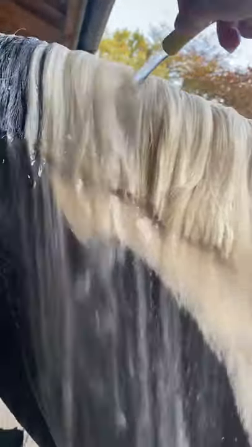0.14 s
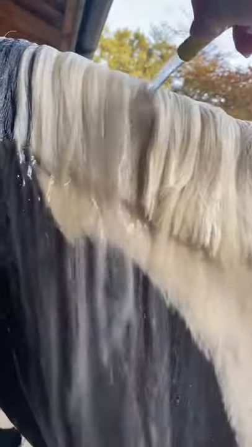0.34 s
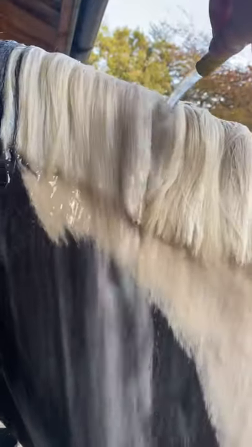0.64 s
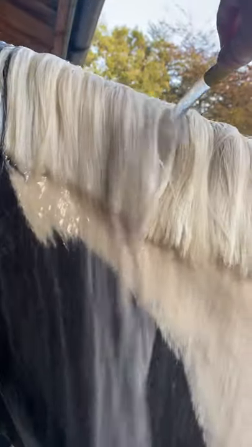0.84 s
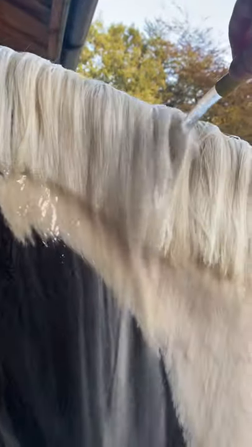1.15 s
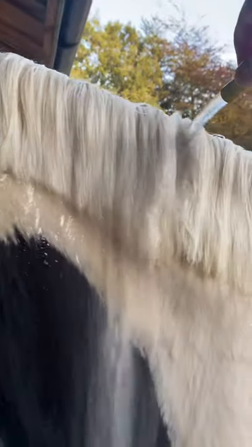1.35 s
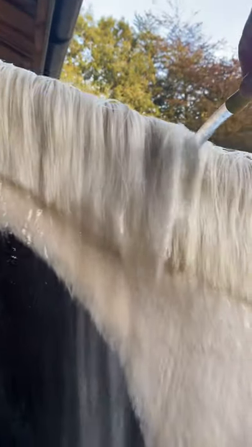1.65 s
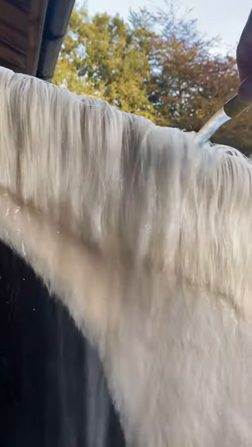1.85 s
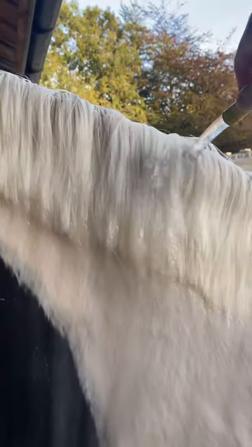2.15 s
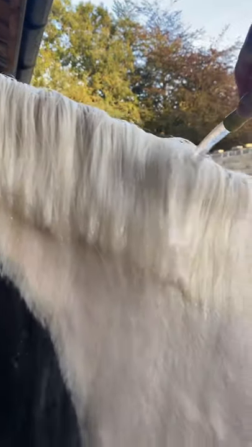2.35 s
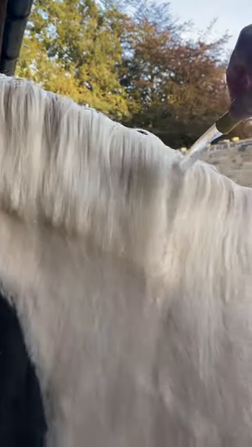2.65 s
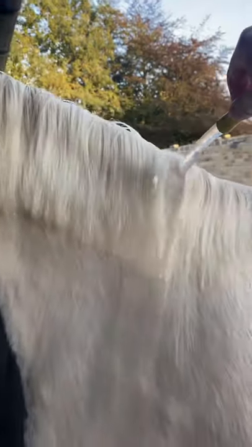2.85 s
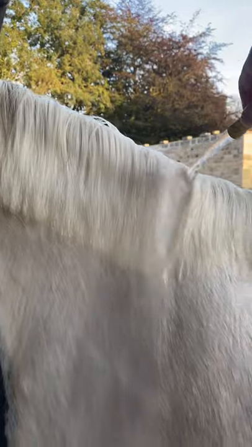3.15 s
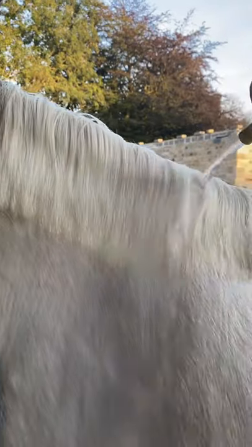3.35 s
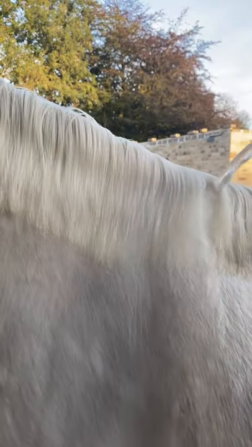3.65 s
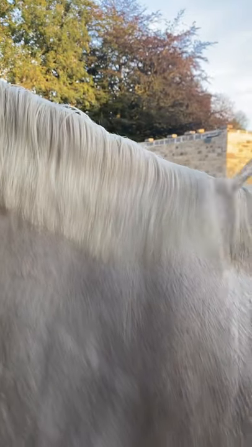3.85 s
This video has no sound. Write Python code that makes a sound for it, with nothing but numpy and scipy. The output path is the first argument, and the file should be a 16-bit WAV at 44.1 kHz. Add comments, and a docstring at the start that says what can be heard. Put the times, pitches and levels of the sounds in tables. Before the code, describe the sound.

Close, crisp hose water gurgles and spatters over wet horse hair, with irregular bright drips throughout. A deep wavering engine hum and soft road rumble swell early, then recede, leaving thinner water in a quiet outdoor yard.

```python
"""Outdoors near a road: water from a hose runs over a horse's wet mane, and a vehicle passes behind.
Road: filtered noise for rumble, tyre roar and murmur. Engine: a wavering sine drone and its octave.
Water: flickering noise and random short pings for gurgle and spray; timed pings for plops and ticks.
Two close microphone ports hear the water with a phase offset that changes with pitch."""
import sys
import numpy as np
from scipy import signal
from scipy.fft import rfft, irfft
from scipy.io import wavfile
from scipy.ndimage import uniform_filter1d

SR = 44100
rng = np.random.default_rng(int(sys.argv[2]) if len(sys.argv) > 2 else 0)


def unload_wav(signal):
    """Save mono or channel-first audio to the path in sys.argv[1] as 16-bit WAV at rate SR, clipped to [-1, 1]."""
    wavfile.write(
        sys.argv[1],
        SR,
        np.round(np.clip(np.atleast_2d(signal).T, -1, 1) * 32767).astype(np.int16),
    )


N = 176400


def amp(db):
    """Amplitude factor from decibels."""
    return 10 ** (np.asarray(db) / 20)


def evened(x):
    """Scale to unit RMS."""
    return x / np.sqrt(np.mean(x ** 2) + 1e-20)


def read(points, hz):
    """Interpolate a (Hz, value) table over log frequency."""
    point_hz, value = np.transpose(points)
    return np.interp(np.log(hz + 1), np.log(point_hz + 1), value)


def curve(table, column):
    """Interpolate one column of a table over time."""
    return np.interp(np.arange(N) / SR, [row[0] for row in table], [row[column] for row in table])


def coloured(x, spectrum):
    """Filter by a (Hz, dB) spectrum, then scale to unit RMS."""
    gain = amp(read(spectrum, np.fft.rfftfreq(N, 1 / SR)))
    return evened(irfft(rfft(x) * gain, N))


def drift(seconds):
    """Slow random curve of unit RMS: noise averaged twice over the given span."""
    span = max(int(seconds * SR), 1)
    once = uniform_filter1d(rng.standard_normal(N), span)
    return evened(uniform_filter1d(once, span))


def blend(same, a, b):
    """Mix spectra a and b, with likeness 0..1 to a, at constant power."""
    return same * a + np.sqrt(1 - same ** 2) * b


# road levels before the left-right lean: start_s, rumble_db, tyre_db, hollow_db
ROAD_LEVELS = [(0.0, -40, -45.5, -56), (0.04, -54, -50, -59), (0.61, -49.5, -51, -58.5),
               (1.05, -45, -48, -55), (1.35, -44.5, -49.5, -46), (1.56, -44, -49.5, -49.5),
               (2.72, -55, -55, -71), (3.97, -57, -57, -63), (4.0, -80, -54, -72)]
# rumble spectrum: freq_hz, gain_db
RUMBLE_SPECTRUM = [(25, -34), (45, -8), (80, 1), (150, -6), (210, -7), (300, -22.5), (500, -59)]
# tyre roar spectrum: freq_hz, gain_db
TYRE_SPECTRUM = [(400, -14), (700, -12), (950, -3.5), (1150, -8), (1400, -10.5), (1800, -16), (2600, -45)]
# hollow part of the roar: freq_hz, gain_db
HOLLOW_SPECTRUM = [(500, -13), (700, -1.5), (800, 4.5), (880, 0), (1100, -57)]
# outdoor murmur spectrum: freq_hz, gain_db
MURMUR_SPECTRUM = [(60, 0), (150, -6), (300, 2), (450, -1), (650, -10), (1200, -57)]
# left-right likeness of the road: freq_hz, likeness_ratio
ROAD_LIKENESS = [(100, 1), (290, 0.95), (600, 0.47), (1500, 0.25)]
# left minus right level of the road: freq_hz, lean_db
ROAD_LEAN_DB = [(60, -4.5), (110, 1.5), (200, 2), (380, 1.5), (700, 4), (1290, 3.5), (2380, 0.5)]
MURMUR_DB = -57


def road():
    """Broadband noise layers: rumble, tyre roar, hollow band, steady murmur; leans left above about 100 Hz."""
    hz = np.fft.rfftfreq(N, 1 / SR)
    layers = [(curve(ROAD_LEVELS, column=1), RUMBLE_SPECTRUM),
              (curve(ROAD_LEVELS, column=2), TYRE_SPECTRUM),
              (curve(ROAD_LEVELS, column=3), HOLLOW_SPECTRUM),
              (MURMUR_DB, MURMUR_SPECTRUM)]

    def take():
        return rfft(sum(amp(db) * coloured(rng.standard_normal(N), spectrum) for db, spectrum in layers))

    a, b = take(), take()
    same = np.clip(read(ROAD_LIKENESS, hz), 0, 1)
    lean = amp(read(ROAD_LEAN_DB, hz) / 2)
    return irfft([a * lean, blend(same, a, b) / lean], N)


# engine RMS levels before waver: start_s, drone_db, octave_db
ENGINE_LEVELS = [(0.0, -35, -49), (0.1, -31, -46.5), (0.48, -37.5, -57.5), (0.63, -34, -45),
                 (0.8, -37, -45), (0.85, -36, -50), (1.06, -31, -40.5), (1.22, -29, -51),
                 (1.34, -31, -36.5), (1.48, -50.5, -58.5), (1.6, -42.5, -35), (2.0, -34.5, -57.5),
                 (2.12, -50, -46.5), (2.25, -43.5, -59), (2.99, -42, -53.5), (3.11, -46.5, -69),
                 (3.39, -50, -59), (3.87, -56, -66), (4.0, -55, -58)]
# engine firing rate, the drone pitch before waver: start_s, pitch_hz
FIRING_RATE = [(0, 61), (.9, 60.3), (1.35, 59.5), (1.6, 58.5), (2, 59.8), (4, 60)]
DRONE_WAVER_DB, OCTAVE_WAVER_DB, PITCH_WAVER_TURNS = 1, 4.1, 0.015


def engine():
    """Sine at the firing rate and its octave, sharing one wavering phase, each wavering in level."""
    turns = np.cumsum(curve(FIRING_RATE, column=1)) / SR + PITCH_WAVER_TURNS * drift(0.044)
    drone_db = curve(ENGINE_LEVELS, column=1) + DRONE_WAVER_DB * drift(0.0185)
    octave_db = curve(ENGINE_LEVELS, column=2) + OCTAVE_WAVER_DB * drift(0.0084)
    drone = amp(drone_db) * np.sin(2 * np.pi * turns)
    octave = amp(octave_db) * np.sin(4 * np.pi * turns)
    return np.sqrt(2) * (drone + octave)  # unit-RMS sines


def hits(rate_per_s, spread_db):
    """Random impulses; exponential dB excess makes a few large."""
    size = amp(spread_db * np.minimum(rng.exponential(1, N), 4))
    return (rng.random(N) < rate_per_s / SR) * size


BURST_DECAY_S, BURSTS_PER_S, BURST_SPREAD_DB = 0.0014, 300, 4  # rate: median, clumping varies it


def bursts():
    """Small drops breaking up: spray loudness jumps and dies within milliseconds."""
    train = hits(BURSTS_PER_S * amp(4 * drift(0.012)), BURST_SPREAD_DB)
    decay = np.exp(-np.arange(900) / SR / BURST_DECAY_S)
    return evened(signal.oaconvolve(train, decay)[:N])


def droplets(lo_hz, hi_hz, cycles, per_s, spread_db, clump_db, count=24):
    """Clumped short pings of many pitches, a few large; the second path is a quarter turn off, random sign."""
    clumps = amp(clump_db * drift(0.01))
    out, t = np.zeros((2, N)), np.arange(600) / SR
    for hz in np.geomspace(lo_hz, hi_hz, count):
        angle = 2 * np.pi * hz * t
        shape = t * hz * np.exp(-2 * t * hz / cycles)
        train = hits(per_s * clumps / count, spread_db)
        flipped = train * rng.choice([-1, 1], N)
        out[0] += signal.oaconvolve(train, evened(shape * np.sin(angle)))[:N]
        out[1] += signal.oaconvolve(flipped, evened(shape * np.cos(angle)))[:N]
    return evened(out)


# water flow: start_s, gurgle_db, spray_db
FLOW_LEVELS = [(0.0, -52, -50.5), (0.154, -45.5, -53.5), (0.312, -44.5, -42.5), (0.512, -46, -47),
               (0.702, -47.5, -45), (0.83, -50.5, -48), (0.86, -53, -62), (0.89, -51, -49),
               (0.98, -54, -54.5), (1.01, -41, -55), (1.23, -42, -46.5), (1.61, -45.5, -44),
               (2.26, -44.5, -45.5), (2.4, -43, -43.5), (2.5, -46, -42.5), (2.72, -48.5, -45.5),
               (2.88, -52, -49.5), (3.15, -50.5, -50.5), (3.44, -53, -51), (4.0, -55.5, -51)]
# gurgle spectrum: freq_hz, gain_db
GURGLE_SPECTRUM = [(1200, -6.5), (1850, -7), (2050, 0.5), (2230, -2.5), (2450, 3.5), (2750, -1), (3150, 3),
                   (3480, -2), (3800, 1), (5200, -2.5), (6500, -2.5)]
# spray spectrum: freq_hz, gain_db
SPRAY_SPECTRUM = [(2500, -14), (4000, -4), (5200, 0), (6200, -2.5), (8500, -2.5), (11000, -4.5),
                  (13000, -7), (16000, -9.5)]
MIST_DB, PATTER_DB, BURST_SHARE = -6, -3.5, 0.55  # fine, coarse droplets and bursts re unit hiss


def stream():
    """Gurgle in the hair and fine spray: flickering hiss plus droplets, two paths surging together."""
    flicker, pops = drift(0.02), BURST_SHARE * bursts()
    gurgle = rng.standard_normal((2, N)) * (amp(4.5 * flicker + 1.3 * drift(0.05)) + pops)
    spray = rng.standard_normal((2, N)) * (amp(1.5 * flicker) + pops)
    gurgle += amp(PATTER_DB) * droplets(1900, 5400, cycles=3, per_s=900, spread_db=2, clump_db=5)
    spray += amp(MIST_DB) * droplets(4150, 13900, cycles=2.3, per_s=700, spread_db=2.9, clump_db=5.3)
    gurgle_amp, spray_amp = amp(curve(FLOW_LEVELS, column=1)), amp(curve(FLOW_LEVELS, column=2))
    return np.array([gurgle_amp * coloured(g, GURGLE_SPECTRUM) + spray_amp * coloured(s, SPRAY_SPECTRUM)
                     for g, s in zip(gurgle, spray)])


SPATTER_DECAY_S = 0.009
CRACK_DB = -8.5  # noise gain re ping peak
LEAD_FROM_HZ = 5800  # second path lags for lower drops, leads for higher


def drops(table, cycles, width):
    """Each drop: a thin noise crack, a Gaussian ping, a dying noise spatter; two paths."""
    size = 2400
    t, freq_hz = np.arange(size) / SR, np.fft.rfftfreq(size, 1 / SR)
    out = np.zeros((2, N + size))
    for start_s, peak_db, pitch_hz, spatter_db in table:
        noise = rng.standard_normal((5, size))
        hiss, snap, lumps = noise[:2], noise[2:4], noise[4]

        turn = np.array([[0], [np.sign(pitch_hz - LEAD_FROM_HZ) * np.pi / 2]])
        envelope = np.exp(-(t * pitch_hz / cycles - 2) ** 2)
        ping = envelope * np.sin(2 * np.pi * pitch_hz * t + turn)

        crack_envelope = np.exp(-abs(t - cycles / pitch_hz) / 0.00017)
        crack = amp(CRACK_DB) * np.diff(snap, prepend=0) * crack_envelope

        lumpy = hiss * amp(4 * evened(uniform_filter1d(lumps, size=30)))
        resonance = 1 / (1 + (np.log(freq_hz / pitch_hz + 1e-3) / width) ** 2)
        low_cut = freq_hz ** 2 / (freq_hz ** 2 + (0.54 * pitch_hz) ** 2)
        fizz = evened(irfft(rfft(lumpy) * resonance * low_cut))
        fade = np.minimum(t / 0.00022, 1) * np.exp(-t / SPATTER_DECAY_S)
        spatter = amp(spatter_db) * fizz * fade

        first = round(start_s * SR)
        out[:, first:first + size] += amp(peak_db) * (ping + crack + spatter)
    return out[:, :N]


# single plops: start_s, ping_peak_db, pitch_hz, spatter_db (re ping peak, before its fade)
PLOP_DROPS = [(0.121, -33.5, 2780, -5.5), (0.274, -34.5, 2650, -8), (0.3145, -34, 3800, -0.5),
              (0.4544, -31, 3580, -4), (0.4675, -33, 4470, -5), (0.4815, -29, 4300, -8),
              (0.5677, -26.5, 4100, -9), (0.587, -31, 3840, -2), (0.6062, -38, 3540, -19.5),
              (0.666, -34.5, 3540, -4), (0.846, -36, 2830, -8), (1.005, -39, 2960, 0),
              (1.0858, -26.5, 3280, -1.5), (1.32, -37, 3080, -11), (1.349, -30.5, 2840, -6),
              (1.377, -36, 2470, -1), (1.6006, -32.5, 3030, -6), (1.6392, -34, 2450, -5.5),
              (1.6936, -29.5, 2500, -11), (1.8436, -35.5, 3160, -3.5), (1.9333, -53, 2440, -12),
              (1.9475, -23.5, 2390, -8.5), (2.145, -35.5, 3300, -3.5), (2.2655, -36, 2230, -4),
              (2.289, -33.5, 2300, -3.5), (2.374, -34, 2500, -8), (2.4003, -31, 2600, -24),
              (2.4425, -35, 3920, -14), (2.4751, -25.5, 2610, -6.5), (2.741, -44.5, 2300, 3),
              (2.8414, -35.5, 3780, -3), (2.9247, -40.5, 2130, -5), (2.9583, -39.5, 2630, -19),
              (3.0925, -36, 2330, -3), (3.184, -36.5, 3160, -4), (3.308, -39, 3700, -6.5),
              (3.674, -38, 2960, -2.5)]
PLOP_CYCLES, PLOP_WIDTH_LOG_HZ = 1.7, 0.3


def plops():
    """Lower, longer drop pings."""
    return drops(PLOP_DROPS, PLOP_CYCLES, PLOP_WIDTH_LOG_HZ)


# single ticks: start_s, ping_peak_db, pitch_hz, spatter_db (re ping peak, before its fade)
TICK_DROPS = [(0.1407, -23.5, 5100, -13), (0.163, -30.5, 4830, -4), (0.1896, -26.5, 9150, -11),
              (0.2394, -42, 5600, -14), (0.2735, -27.5, 6450, -4.5), (0.3082, -29.5, 7100, -5),
              (0.3733, -23, 6560, -10), (0.452, -30.5, 7340, -6.5), (0.4804, -24.5, 5050, -19),
              (0.5515, -37, 7000, -20), (0.559, -49, 7000, -25), (0.5676, -30, 8900, -12),
              (0.6085, -21, 7700, -9.5), (0.622, -18.5, 5360, -13), (0.6462, -30, 6960, -12),
              (0.6565, -22, 5800, -15), (0.7238, -31.5, 4910, -7), (0.8225, -38, 6550, 0),
              (0.8485, -35, 6660, -9), (1.0039, -25, 5600, -12.5), (1.1537, -28, 9100, -10),
              (1.3311, -27, 7300, -12), (1.377, -31, 12000, -6), (1.6018, -28.5, 9700, -6),
              (1.7979, -32, 8100, -7.5), (2.0423, -26.5, 7630, -14), (2.3325, -25.5, 7460, -18),
              (2.373, -30.5, 7036, -3), (2.459, -26, 5530, -24), (2.4914, -15.5, 8800, -36),
              (2.5194, -29, 7190, -7), (2.596, -29.5, 6560, -16), (2.7113, -29.5, 6550, -11.5),
              (2.755, -27, 7100, -11), (2.7747, -26, 7060, -9), (2.8434, -29.5, 6800, -10),
              (3.1852, -15.5, 6040, -16), (3.5516, -29.5, 5160, -16), (3.6506, -32.5, 7700, -8.5),
              (3.7284, -24.5, 6600, -18.5), (3.899, -32, 5000, -15)]
TICK_CYCLES, TICK_WIDTH_LOG_HZ = 1.05, 0.4


def ticks():
    """Higher, shorter drop pings."""
    return drops(TICK_DROPS, TICK_CYCLES, TICK_WIDTH_LOG_HZ)


# left-right likeness of the water: freq_hz, likeness_ratio
PORT_LIKENESS = [(1800, .75), (2500, .65), (2900, .1), (4000, .15), (5000, .55), (5500, .4), (6100, .7),
                 (10900, .65), (11800, 1)]


def spread(a, b):
    """Left port hears one water path, right port a blend of both."""
    same = read(PORT_LIKENESS, np.fft.rfftfreq(N, 1 / SR))
    return a, irfft(blend(same, rfft(a), rfft(b)), N)


# phase between the ports: freq_hz, left_lead_rad
PORT_LEAD = [(1500, 0), (2500, -.6), (3400, -2.8), (5200, -2.7), (5500, -4), (6100, -5.6), (8000, -4.7),
             (10500, -4.1), (11800, -np.pi)]


def ports(left, right):
    """Right port hears the water with a phase shift that changes with pitch."""
    lead_rad = read(PORT_LEAD, np.fft.rfftfreq(N, 1 / SR))
    return np.array([left, irfft(rfft(right) * np.exp(-1j * lead_rad), N)])


def scene():
    """Road and engine behind, water in front."""
    water = stream() + plops() + ticks()
    return road() + engine() + ports(*spread(*water))


EDGE_HZ = 15780


def record(dry):
    """Band limit: linear-phase low-pass."""
    lowpass = signal.firwin(1023, EDGE_HZ, window=("kaiser", 9), fs=SR)
    return signal.oaconvolve(dry, lowpass[None], "same")


dry = scene()
out = record(dry)
unload_wav(out)
```